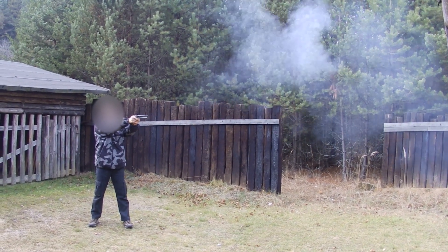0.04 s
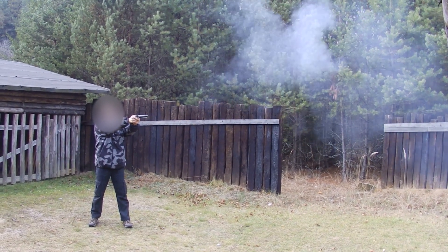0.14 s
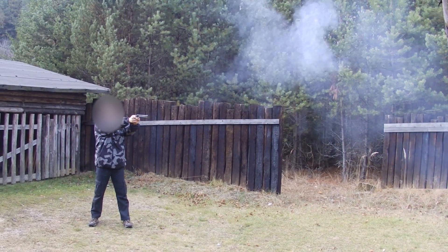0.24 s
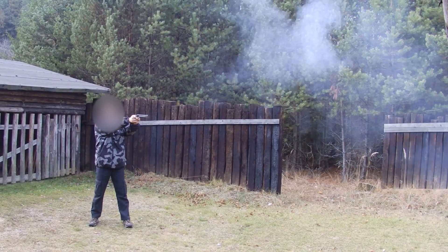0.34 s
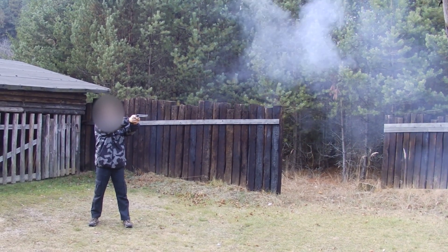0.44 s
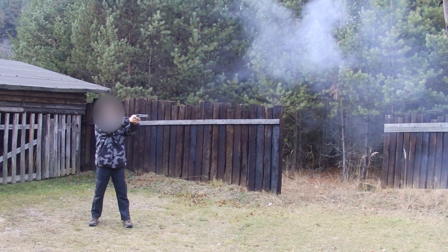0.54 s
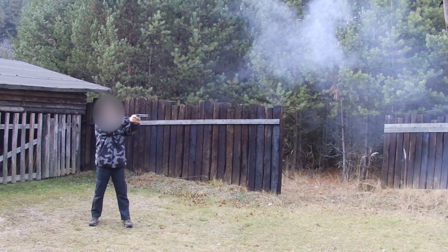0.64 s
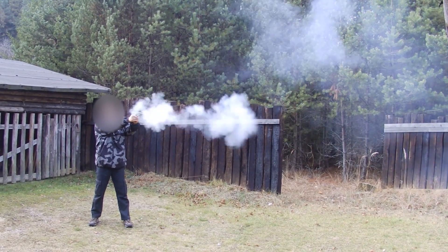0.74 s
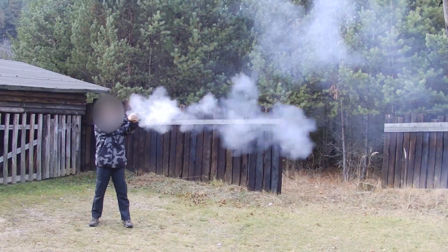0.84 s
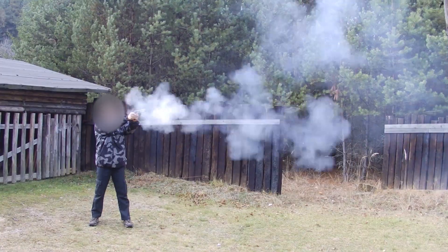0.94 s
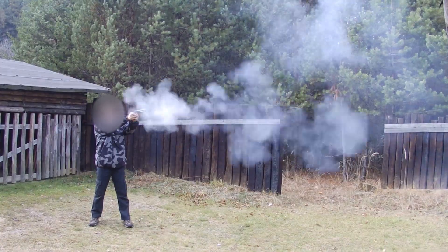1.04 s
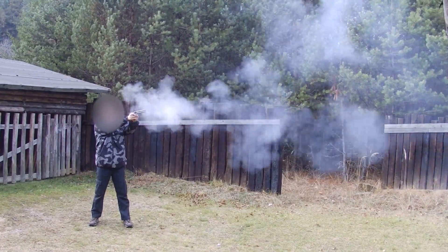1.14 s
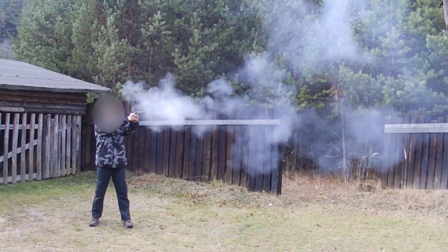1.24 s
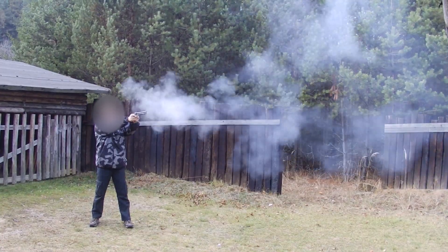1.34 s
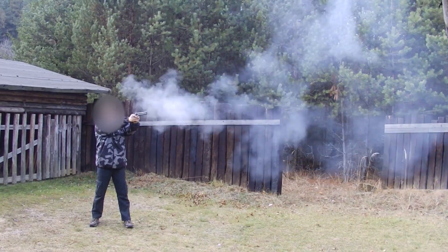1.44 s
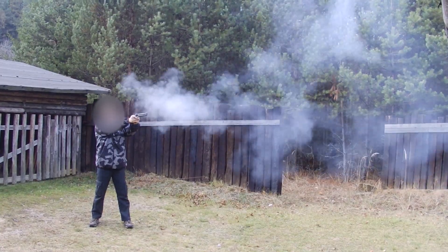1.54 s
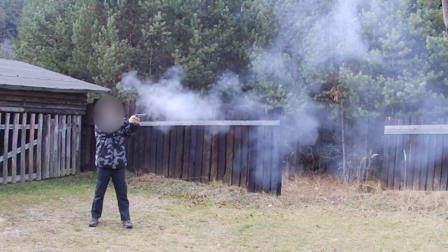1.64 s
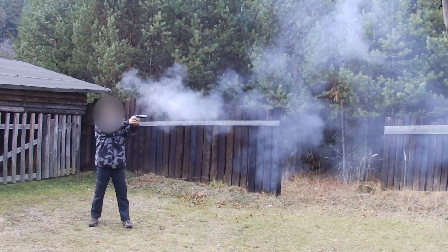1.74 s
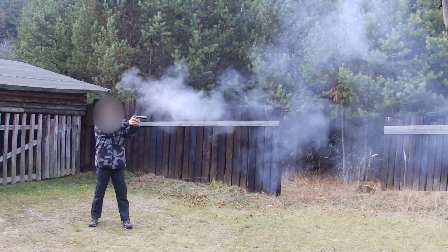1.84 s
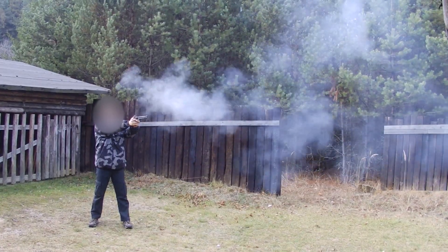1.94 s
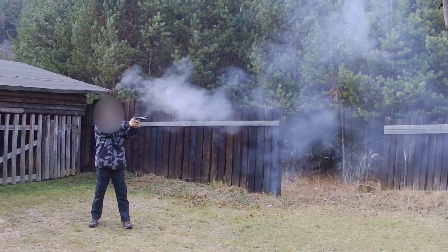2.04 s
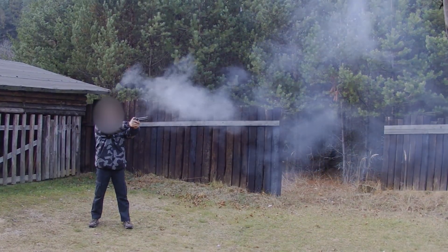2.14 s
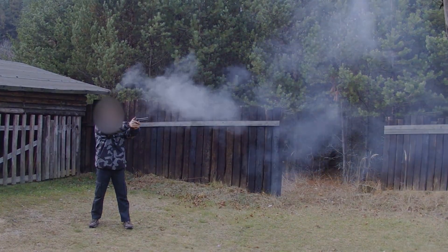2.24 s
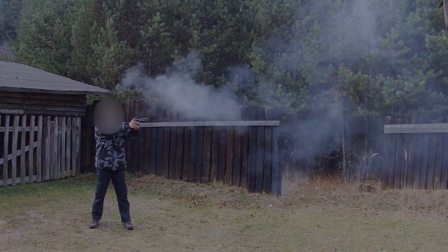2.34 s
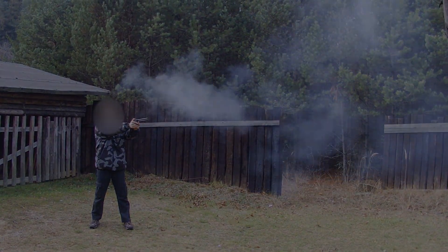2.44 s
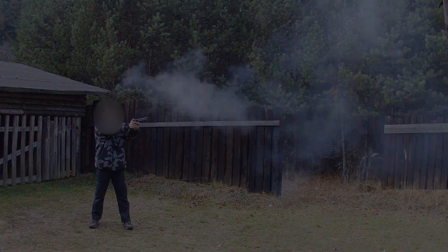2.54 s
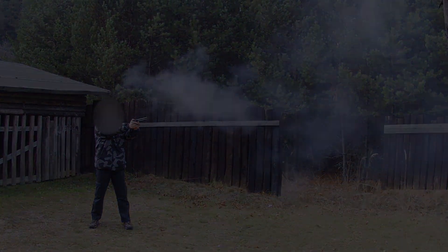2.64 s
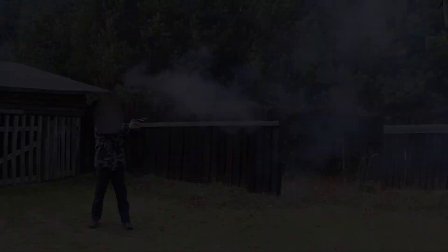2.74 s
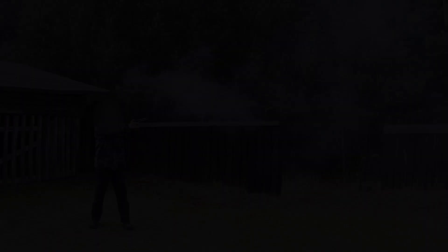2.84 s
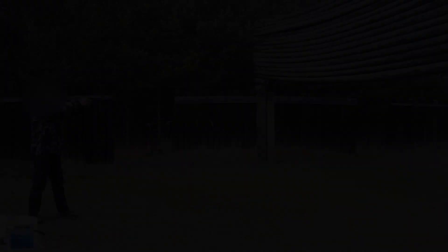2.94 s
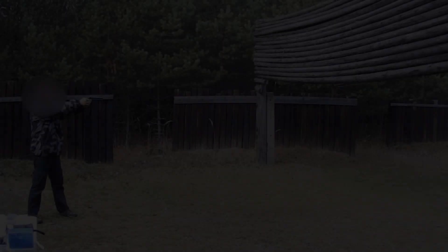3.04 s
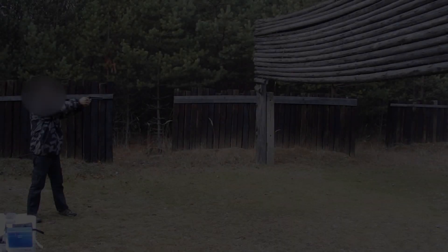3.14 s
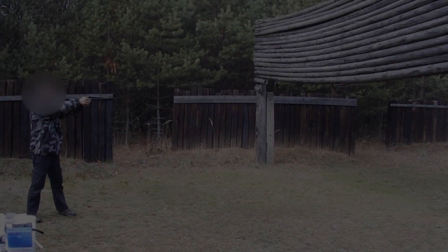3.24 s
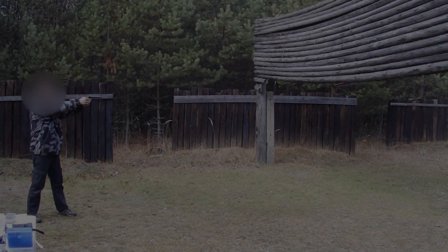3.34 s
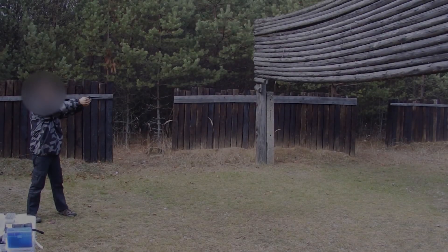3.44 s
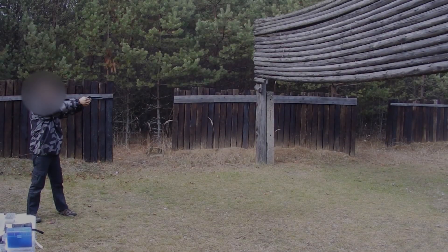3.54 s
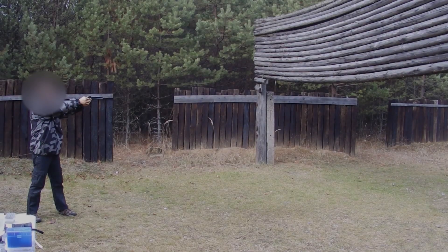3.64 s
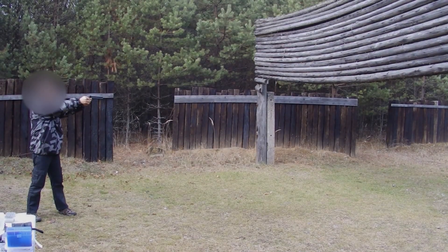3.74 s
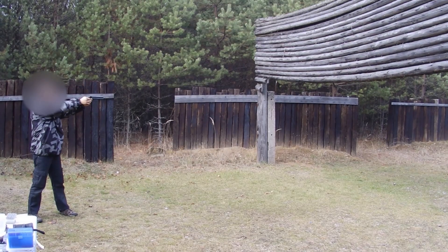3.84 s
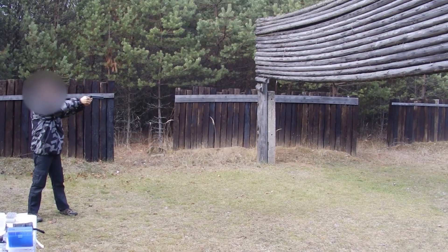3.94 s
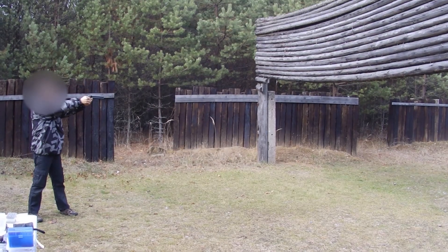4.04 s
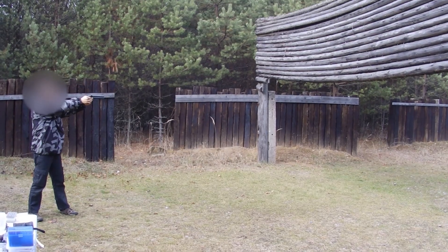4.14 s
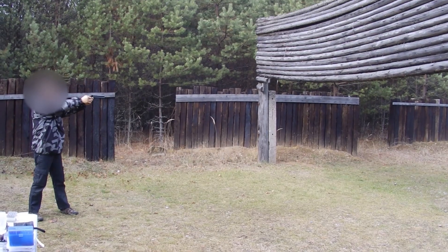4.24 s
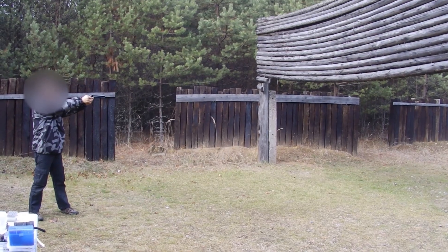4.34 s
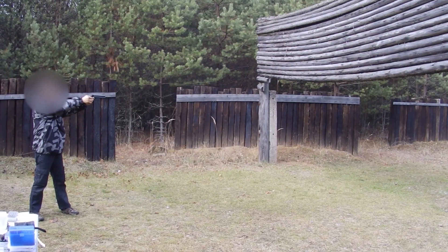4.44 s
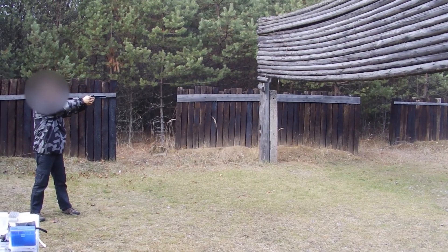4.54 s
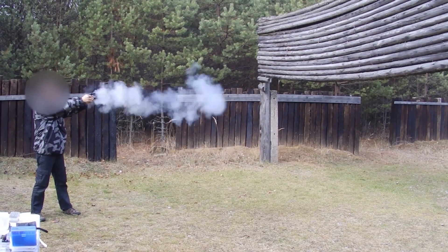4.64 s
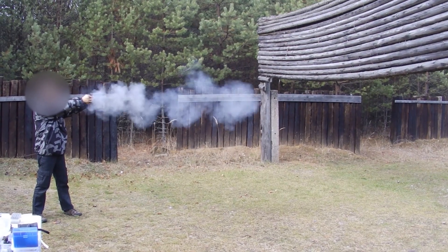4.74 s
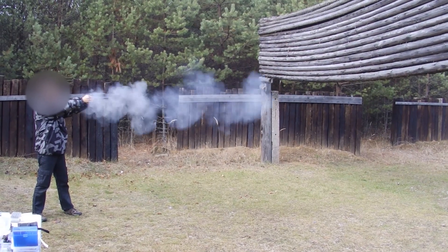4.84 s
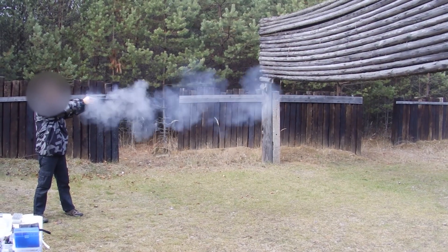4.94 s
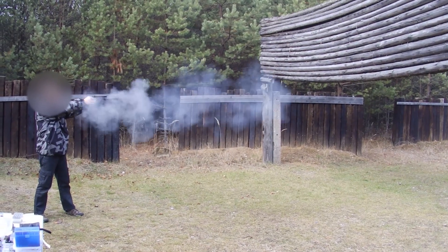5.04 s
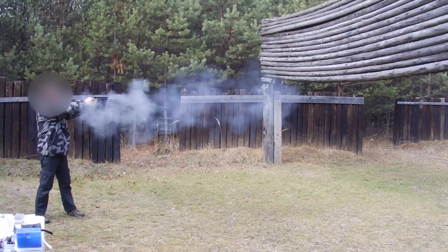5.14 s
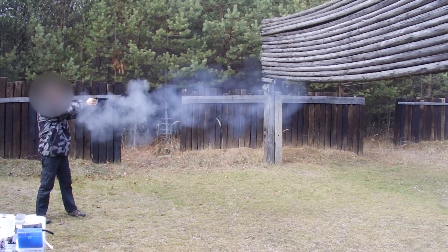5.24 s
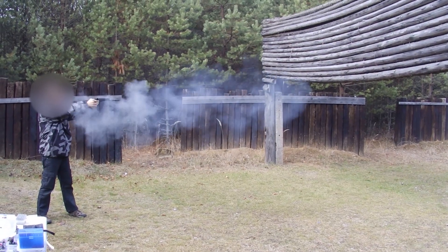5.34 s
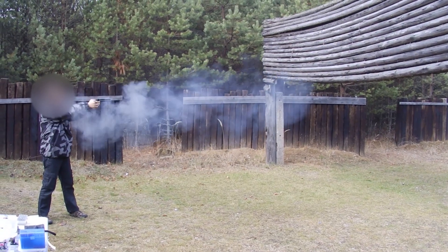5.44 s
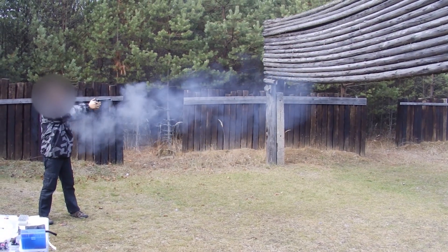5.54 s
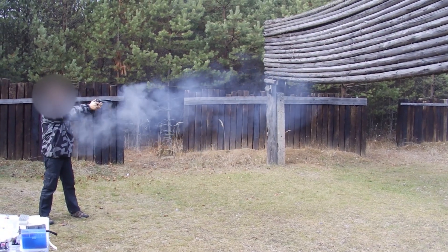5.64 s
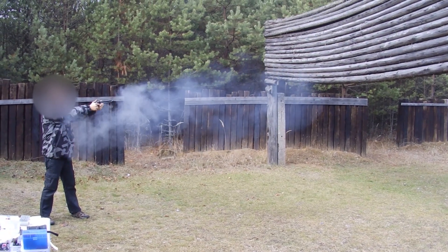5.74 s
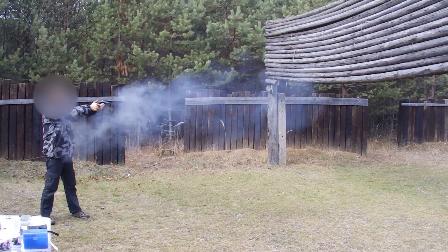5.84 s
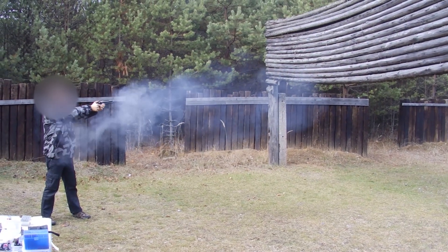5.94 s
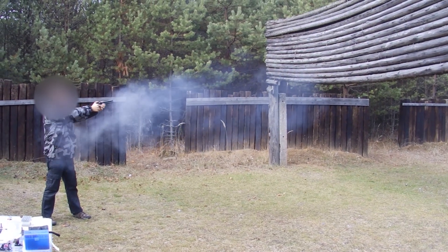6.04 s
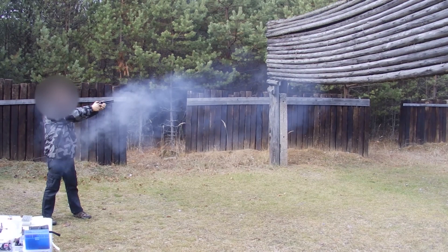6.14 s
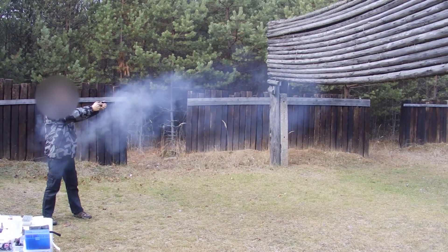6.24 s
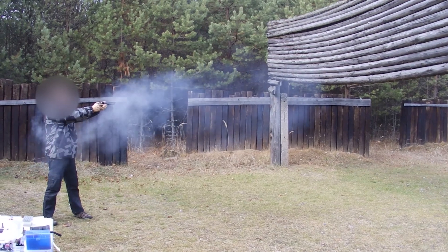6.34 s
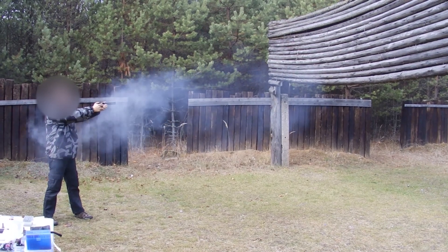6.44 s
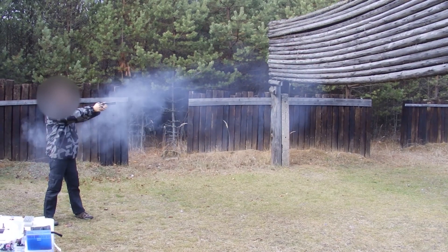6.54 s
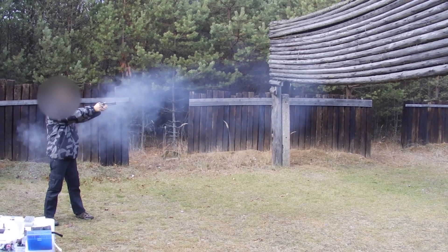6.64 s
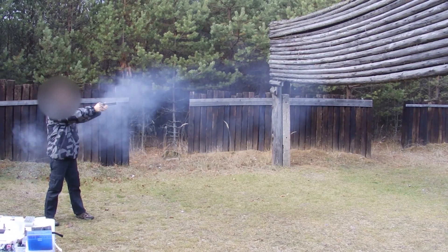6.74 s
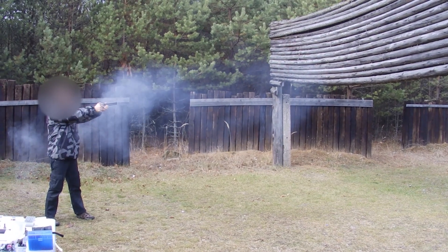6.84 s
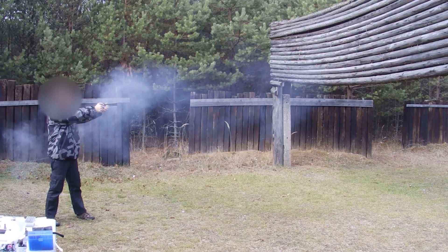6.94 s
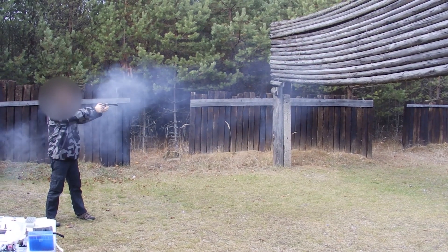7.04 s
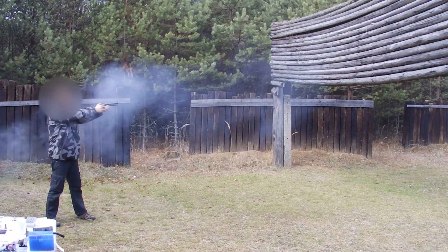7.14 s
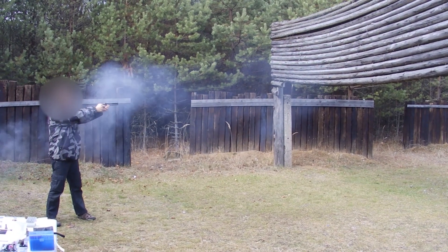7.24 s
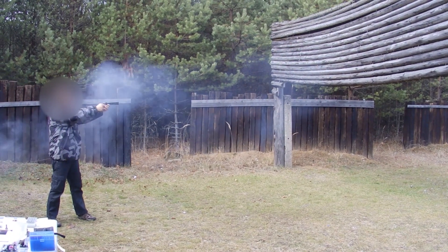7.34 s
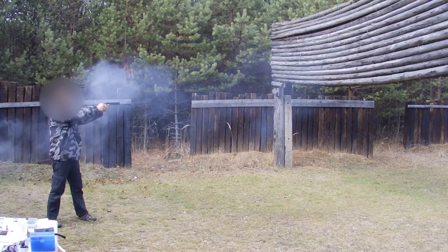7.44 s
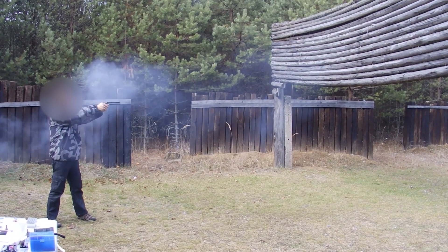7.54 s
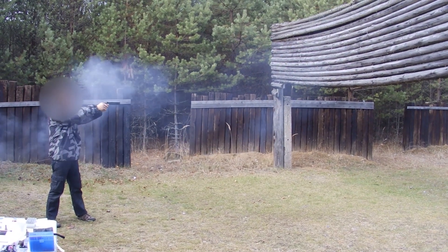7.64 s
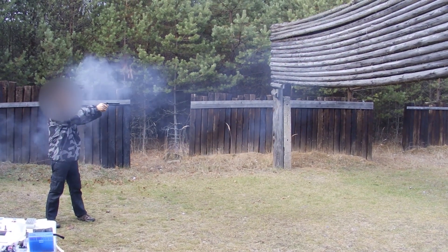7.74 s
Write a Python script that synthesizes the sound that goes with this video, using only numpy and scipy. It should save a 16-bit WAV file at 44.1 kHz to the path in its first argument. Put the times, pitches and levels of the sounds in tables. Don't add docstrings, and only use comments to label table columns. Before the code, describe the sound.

A side-on camera at a wooded shooting range picks up faint low wind, circuit hiss and muffled focus-motor thuds. A pistol bangs abruptly, its cap, blast and fence echoes blurring into one ringing crack with a short boom, followed by a washing forest tail and tiny steel snaps. After a scene change the ticking returns, then another shot, tail and sharper clicks. Automatic gain drops and slowly recovers.

```python
import sys
import numpy as np
from scipy import signal
from scipy.fft import rfft, irfft, next_fast_len
from scipy.io import wavfile
from scipy.ndimage import uniform_filter1d

SR = 44100
rng = np.random.default_rng(int(sys.argv[2]) if len(sys.argv) > 2 else 0)


def volts_from_db(level):
    exponent = np.asarray(level, float) / 20
    return 10 ** exponent


def transcribe(u):
    v = np.clip(np.atleast_2d(u).T, -1, 1)
    q = np.round(v * 32767).astype(np.int16)
    wavfile.write(sys.argv[1], SR, q)


N = 344057
TIME = np.arange(N) / SR
SCENE_CHANGE_S = 2.8265


def level(x, db):
    return x * volts_from_db(db) / np.sqrt(np.mean(x ** 2))


def ring(x, modes):
    out = 0
    for k, (hz, width, db) in enumerate(modes):
        b, a = signal.iirpeak(hz, hz / width, fs=SR)
        out = out + (-1) ** k * volts_from_db(db) * signal.lfilter(b, a, x)
    return out


def bands(x, colour):
    size = next_fast_len(N)
    octave = np.log2(np.arange(size // 2 + 1) * SR / size + 1)
    hz, db = np.transpose(colour)
    shaped = rfft(x, size) * volts_from_db(np.interp(octave, np.log2(hz), db))
    for centre in np.arange(14, 43) / 3:
        triangle = np.clip(1 - 3 * abs(octave - centre), 0, 1)
        yield 2 ** centre, irfft(shaped * triangle, size)[:N]


def walk(rate):
    hold = int(SR / rate)
    steps = np.repeat(rng.standard_normal(N // hold + 1), hold)
    return 0.65 * uniform_filter1d(uniform_filter1d(steps, hold), hold)[:N]


def add(out, s, sound, peak_db):
    i = int(s * SR)
    out[i:i + len(sound)] += sound * volts_from_db(peak_db) / abs(sound).max()


def front(chance, spread_ms):
    t = np.arange(len(chance)) / SR
    return (t == 0) + 0.24 * chance * np.exp(-1000 * t / max(spread_ms, .1))


# (shot time [s], dive [dB], climb [dB/s])
DIVES = [
    (0.876, -51, 26.5),
    (4.759, -48.5, 26),
]


def gain_control():
    gain_db = np.zeros(N)
    for s, dive_db, climb in DIVES:
        gain_db += np.where(TIME > s, np.minimum(dive_db + climb * (TIME - s), 0), 0)
    gain_db[(TIME > SCENE_CHANGE_S) & (TIME < DIVES[1][0])] = 0
    return gain_db


# (frequency [Hz], level [dB per Hz])
FLOOR_COLOUR = [(25, -25), (60, -7.5), (118, -11.5), (250, -2.5), (450, -0.5), (1100, -5), (1600, -10.5),
                (2000, -15.5), (2700, -18), (5300, -19), (7600, -29.5), (10500, -19.5), (13500, -14.5),
                (16000, -15.5)]
# (frequency [Hz], level [dB rms])
HUM = [(120, -77)]


def floor():
    floor_db, converter_db, notch_hz = -59, -94, 15050
    gate_hz, gate_db = 12000, -23
    gain_db = gain_control()
    hiss = 0
    for hz, part in bands(rng.standard_normal(N), FLOOR_COLOUR):
        hiss = hiss + part * volts_from_db(walk(9) * 2.8 * (hz < 1500))
    hiss = level(signal.lfilter(*signal.iirnotch(notch_hz, 45, fs=SR), hiss), floor_db)
    dull = signal.sosfiltfilt(signal.butter(12, gate_hz, fs=SR, output="sos"), hiss)
    shut = uniform_filter1d(1. * (gain_db + 2.5 * walk(30) < gate_db), size=512)
    converter = signal.lfilter(*signal.butter(6, gate_hz, fs=SR), rng.standard_normal(N))
    converter = level(converter, converter_db)
    hum = 0
    for hz, db in HUM:
        hum = hum + volts_from_db(db + 2.9 * walk(13)) * np.sqrt(2) * np.sin(2 * np.pi * hz * TIME)
    return (hiss + shut * (dull - hiss) + hum) * volts_from_db(gain_db) + converter


# (time [s], peak level [dB], pitch [Hz])
TICKS = [(0.009, -49, 523), (0.122, -47, 443), (0.199, -51, 509), (0.254, -44, 323), (0.329, -54, 452),
         (0.39, -42.5, 333), (0.459, -50, 650), (0.523, -51, 780), (0.589, -46, 468), (0.718, -47.5, 626),
         (0.8, -52, 325), (3.889, -47.5, 920), (3.958, -42, 403), (4.026, -43.5, 418), (4.092, -44.5, 354),
         (4.161, -47, 310), (4.23, -47, 460), (4.294, -47, 287), (4.352, -45.5, 310), (4.426, -48, 296),
         (4.5, -50, 450), (4.561, -43.5, 299), (4.694, -47, 312), (6.456, -42, 467)]


def ticks():
    out = np.zeros(N)
    t = np.arange(2048) / SR
    for (s, db, hz), chance in zip(TICKS, rng.standard_normal((len(TICKS), 2048))):
        thud = chance * t * np.exp(-t / 0.0053)
        add(out, s, ring(thud, [(hz, 200, 0), (1.97 * hz, 500, -5)]), db - 3.5)
    return out


# (time [s], crack peak [dB], boom re crack [dB], sizzle re crack [dB])
BLASTS = [(.8733, -24, -17.5, -6.5), (0.8765, -6.5, -10.5, -4.5), (0.879, -16.5, 2.5, -3),
          (.8828, -30, -2, -15), (.8915, -29, -3, -11.5), (0.8925, -8, -4.5, -5), (0.8951, -16, 5.5, -11.5),
          (.9025, -25.5, 0.5, -15.5), (.9118, -20.5, -0.5, -3), (0.9133, -21, 8.5, -14.5),
          (0.917, -24, 9.5, -12), (.9243, -20.5, 9, -7.5), (.9305, -26, 0.5, -14), (4.755, -27, -17, -2.5),
          (4.7583, -6, -12, -4.5), (4.7609, -12.5, -3, -5.5), (4.7643, -13, -12, -5.5),
          (4.767, -16, -4.5, -11.5), (4.7688, -18, 5, -10), (4.7743, -17.5, 1.5, -8.5),
          (4.7779, -21.5, 2.5, -8), (4.7862, -18.5, 10.5, -14), (4.7946, -23.5, -6, -14.5),
          (4.802, -27.5, 10.5, -5.5), (4.8115, -27.5, 9, -20), (4.8386, -31, -4, -24), (4.851, -35, 4, -25)]
# (centre [Hz], width [Hz], level [dB])
CRACK = [(1550, 500, -6), (2750, 600, 0)]
# (centre [Hz], width [Hz], level [dB])
EDGE = [(3800, 280, 4), (5030, 1300, -4.5), (6914, 1100, -7)]
# (centre [Hz], width [Hz], level [dB])
BOOM = [(139, 120, -7.5), (335, 110, 0.5)]
# (centre [Hz], width [Hz], level [dB])
SIZZLE = [(6200, 1500, -8), (10500, 5800, -2.5), (13800, 630, 9.5), (16130, 860, 2.5)]


def blasts():
    edge_db = -7
    out = np.zeros(N)
    for (s, db, boom_db, sizzle_db), chance in zip(BLASTS, rng.standard_normal((len(BLASTS), 2048))):
        spread_ms = -0.06 * db
        boom_hz = 720 + 500 * np.exp(-(spread_ms / 0.7) ** 2)
        push = front(chance, spread_ms)
        body = BOOM + [(boom_hz, 0.75 * boom_hz, 0)]
        add(out, s, ring(ring(push, CRACK), CRACK), db)
        add(out, s, ring(ring(push, EDGE), [(4930, 4500, 0)]), db + edge_db)
        add(out, s, ring(ring(push, body), [(503, 4300, 0)]), db + boom_db)
        add(out, s, ring(ring(push, SIZZLE), [(11400, 3000, 0)]), db + sizzle_db)
    return out


# (fences answer after [s], yard level at the shot [dB], yard fade [dB/s], forest level [dB])
FOREST = [
    (.024, 22, -190, -20.5),
    (0.0021, 21.5, -230, -21.5),
]
# (frequency [Hz], level [dB per Hz])
FOREST_COLOUR = [(25, -38.5), (60, -17.5), (120, -9), (220, -3.5), (340, -3), (500, -1.5), (900, -3),
                 (1600, -3.5), (2000, -8), (2600, -3.5), (3300, -10.5), (5800, -14), (7800, -27.5),
                 (12500, -19.5), (16000, -28.5)]


def forest():
    build_s, edge_s, fall_db = 0.0026, 0.47, -58
    air_db, air_power, air_age = 2.5, 1.56, 1
    scatter_db = -24
    bass_dip_db, bass_late_db = -10, 1.5
    trunks = rng.standard_normal(N) * volts_from_db(1.5 * rng.exponential(size=N))
    heard, age = np.zeros(N), np.zeros(N)
    for (s, _, _), (first_s, yard_db, fade_db, wood_db) in zip(DIVES, FOREST):
        end_s = SCENE_CHANGE_S if s < SCENE_CHANGE_S else np.inf
        inside = (TIME >= s) & (TIME < end_s)
        t = TIME[inside] - s
        age[inside] = t
        build = np.clip((t - first_s) / build_s, 0, 1)
        yard = volts_from_db(yard_db + fade_db * t)
        wood = volts_from_db(wood_db + fall_db * np.log10(t + edge_s))
        heard[inside] = build * np.hypot(yard, wood)
    parts = list(bands(trunks, FOREST_COLOUR))
    middle = np.std(sum(part for hz, part in parts if 300 < hz < 1500))
    clumps = walk(33)
    fading_db, late_db = bass_dip_db * (1 - np.exp(-age / 0.72)), bass_late_db * age
    out = 0
    for hz, part in parts:
        bass = np.clip(np.log2(500 / hz), 0, 3.5)
        bass_db = bass * fading_db + min(bass, 1.2) * late_db
        air = volts_from_db(-age ** air_age * air_db * (hz / 1000) ** air_power)
        scatter = volts_from_db(scatter_db * hz / 6000 - 5 * age)
        out = out + part * volts_from_db(bass_db + 2.4 * walk(9.8)) * (air + scatter)
    return out * uniform_filter1d(heard, size=64) * volts_from_db(gain_control() + clumps) / middle


# (time [s], peak [dB], upper ring re peak [dB], sizzle re peak [dB])
CLICKS = [(1.181, -45, -19, -50), (1.941, -62, -3, -40), (2.043, -36, -18, -56), (2.087, -44, -8, -46),
          (2.1095, -49, -10, -40), (2.1292, -47, -10, -40), (2.1533, -49, -11, -40), (2.2, -56, -6, -30),
          (2.3, -59, -4, -30), (2.462, -43.5, -30, -45), (2.52, -64, -1, -23.5), (5.0576, -44.5, -18, -45),
          (5.087, -44, -16, -55), (5.277, -42, -23, -62), (5.974, -56, -4, -26), (6.0474, -53, -6, -24),
          (6.058, -44, -6, -24), (6.315, -39.5, 1.5, -2), (6.328, -58, 0, -14), (6.348, -37.5, 1, -36),
          (6.406, -45.5, 8, 5.5), (6.419, -52, 4, -20), (6.574, -46, -7, -30), (6.886, -52, 0, -15)]
# (centre [Hz], width [Hz], level [dB])
STEEL = [(3500, 440, 6.5), (4650, 1600, 1), (5470, 1740, 0), (7040, 2400, -16)]


def clicks():
    out = np.zeros(N)
    t = np.arange(16384) / SR
    for (s, db, upper_db, sizzle_db), chance in zip(CLICKS, rng.standard_normal((len(CLICKS), len(t)))):
        ring_ms, echo_db = 19 + 0.5 * upper_db, -9.5 + 0.5 * upper_db
        push = front(chance, ring_ms / np.log(1000))
        echo = chance[::-1] * np.exp(-t / 0.062)
        cavity = ring(ring(push, [(2620, 730, 0)]), [(2540, 850, 0)])
        add(out, s, ring(cavity, [(2700, 1400, 0)]), db)
        add(out, s, ring(ring(push, STEEL), [(5020, 1400, 0)]), db + upper_db)
        add(out, s, ring(ring(push, SIZZLE), [(11000, 11000, 0)]), db + sizzle_db)
        add(out, s, ring(ring(echo, STEEL), [(4240, 3000, 0)]), db + echo_db)
    return out


def scene():
    top = signal.ellip(10, .3, 60, 15780, fs=SR, output="sos")
    quieter = floor() + ticks() + forest() + clicks()
    return (blasts() + signal.sosfilt(top, quieter))[None]


def band_limit(x):
    return signal.sosfilt(signal.butter(12, 17100, fs=SR, output="sos"), x)


def record(dry):
    band = signal.ellip(8, .3, 70, 16900, fs=SR, output="sos")
    rounded = .62 * np.tanh(dry / .62)
    return band_limit(signal.sosfilt(band, rounded))


dry = scene()
out = record(dry)
transcribe(out)
```